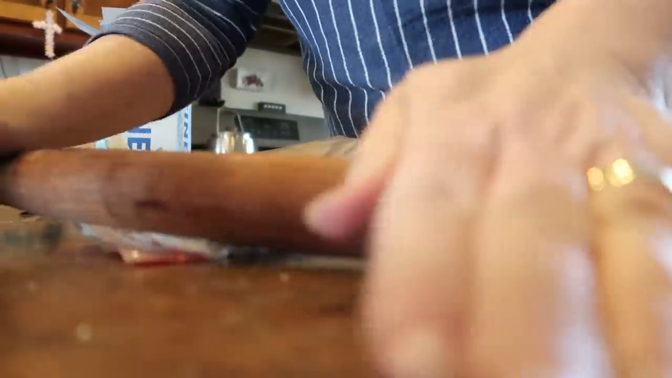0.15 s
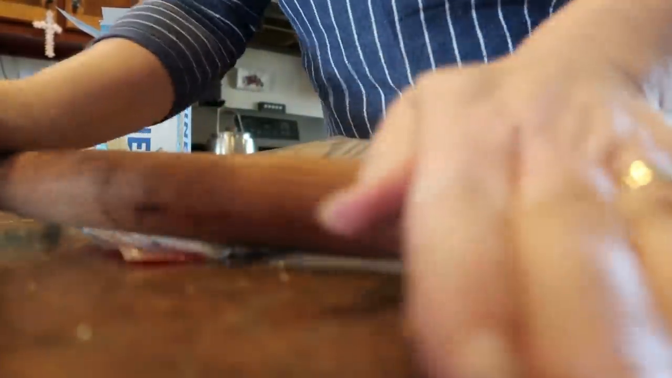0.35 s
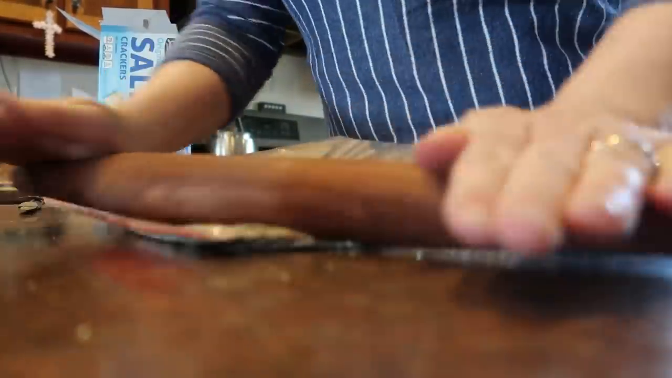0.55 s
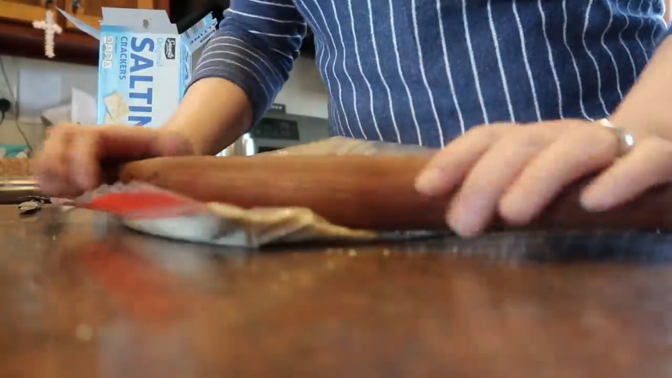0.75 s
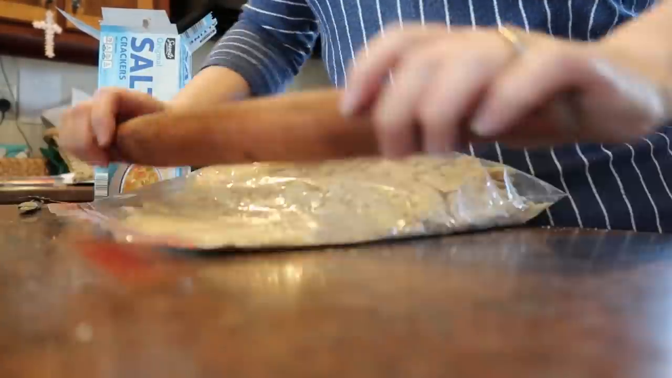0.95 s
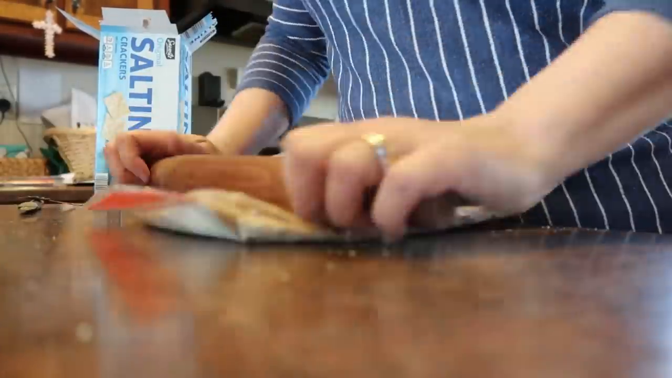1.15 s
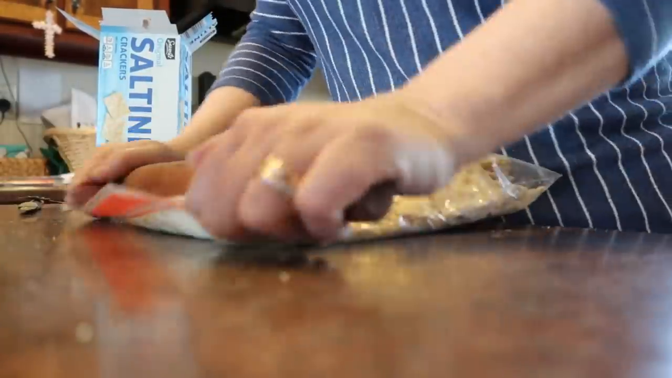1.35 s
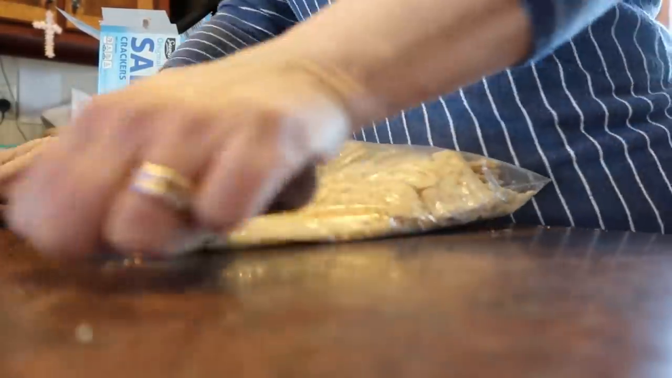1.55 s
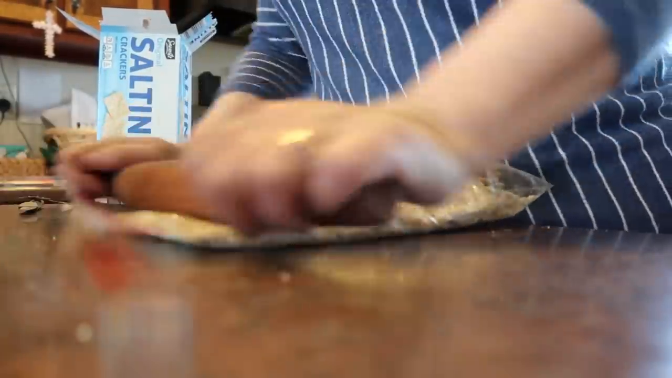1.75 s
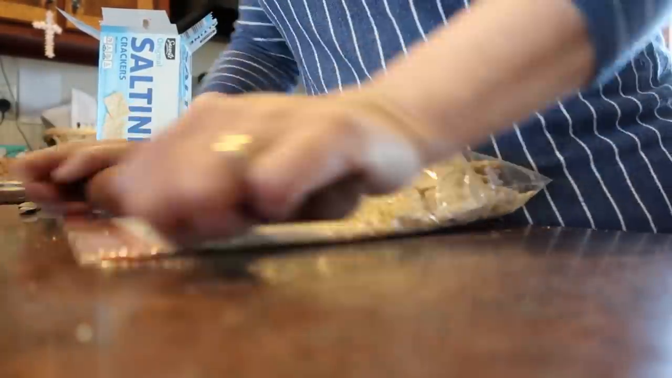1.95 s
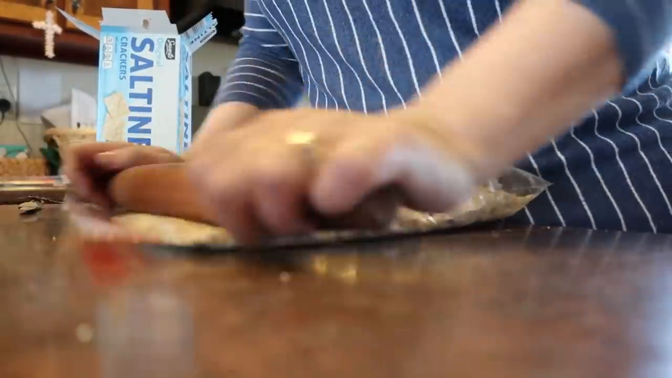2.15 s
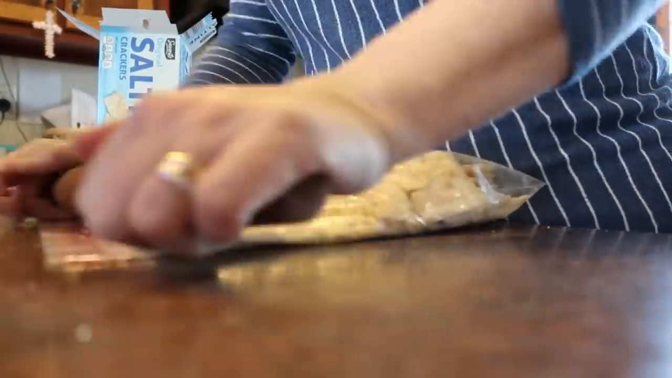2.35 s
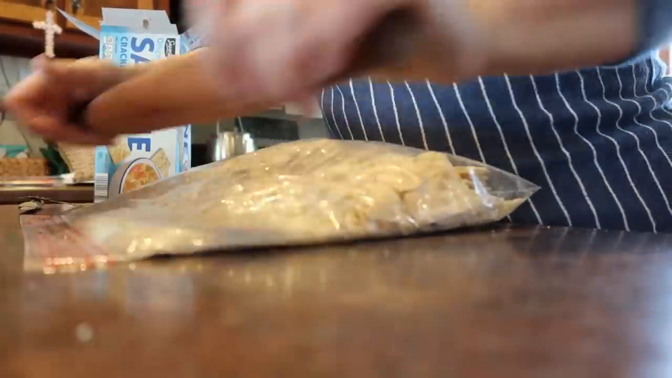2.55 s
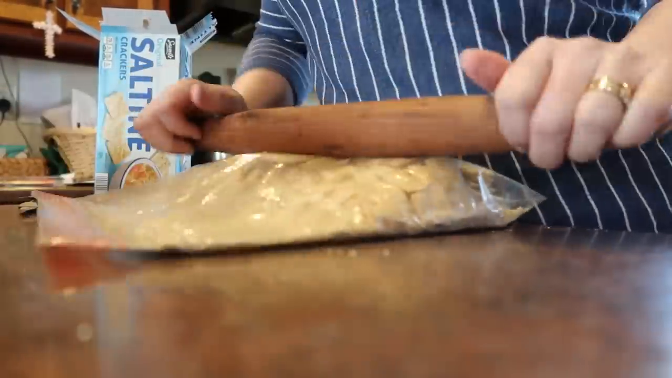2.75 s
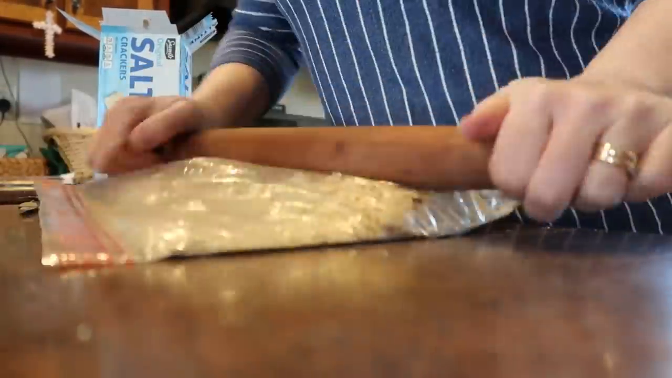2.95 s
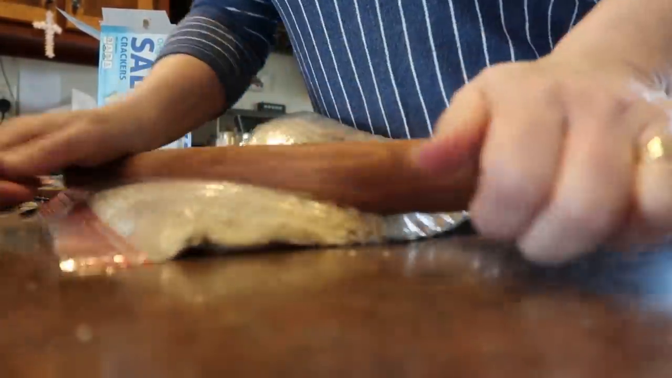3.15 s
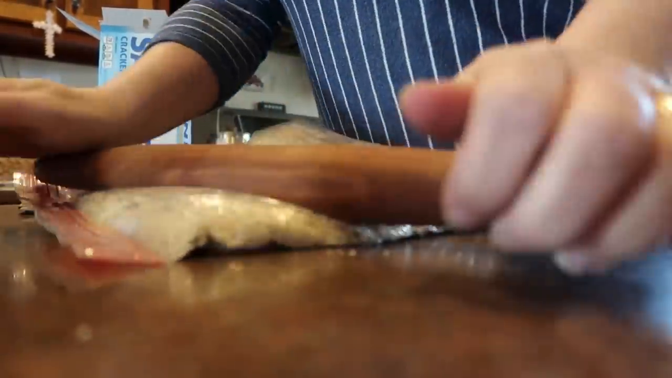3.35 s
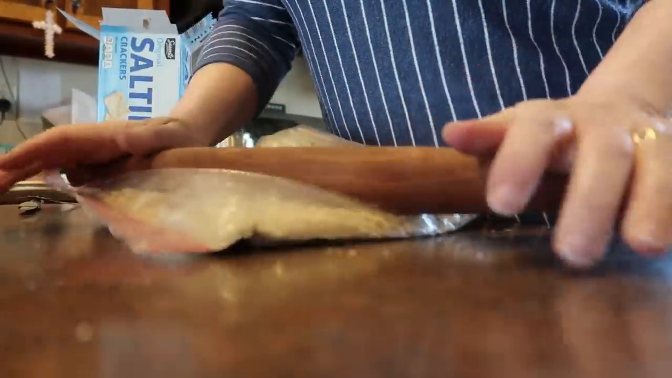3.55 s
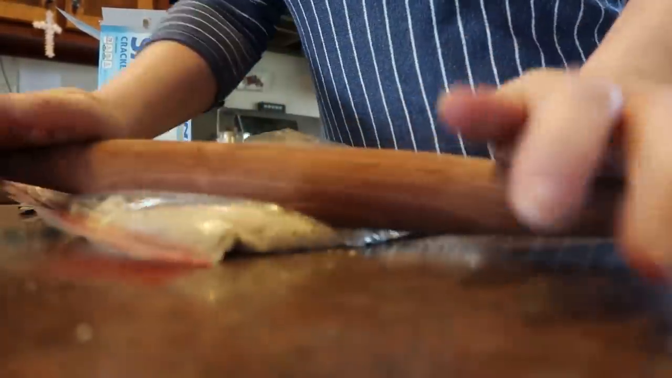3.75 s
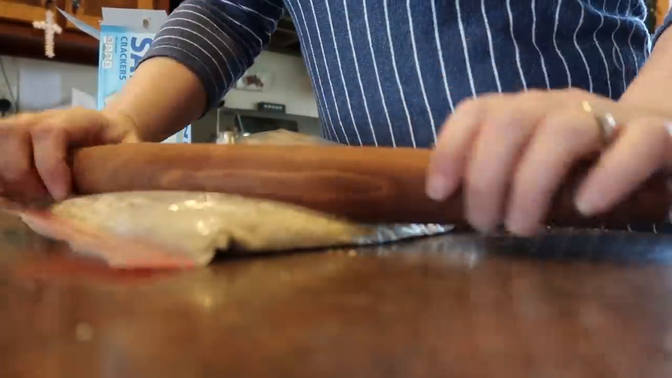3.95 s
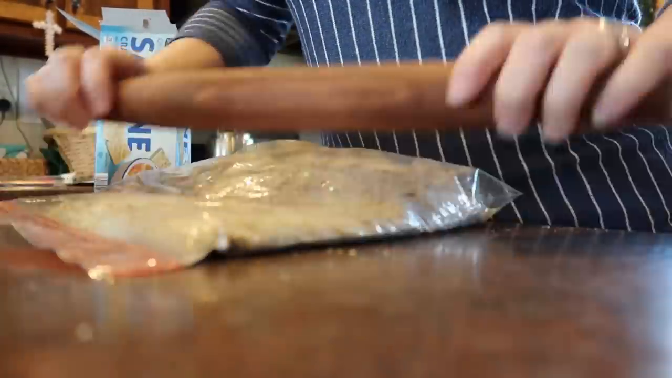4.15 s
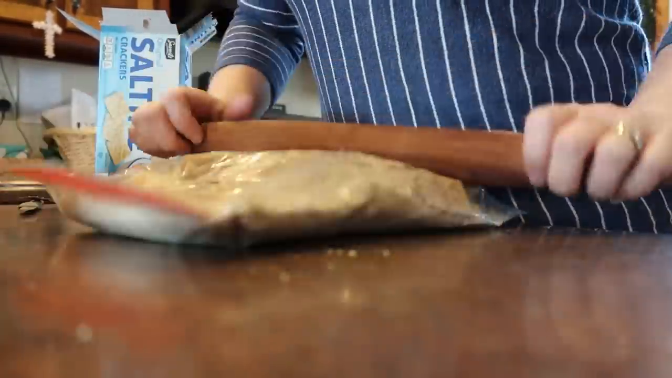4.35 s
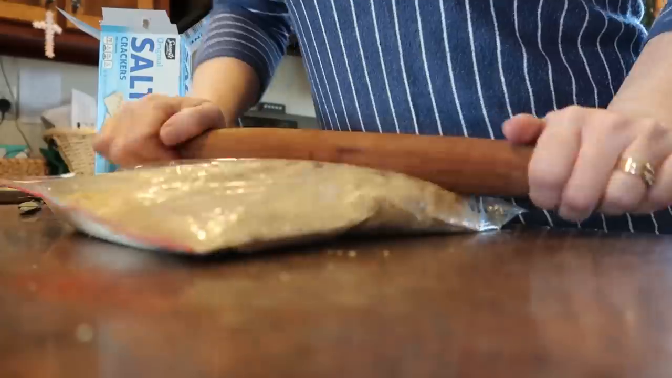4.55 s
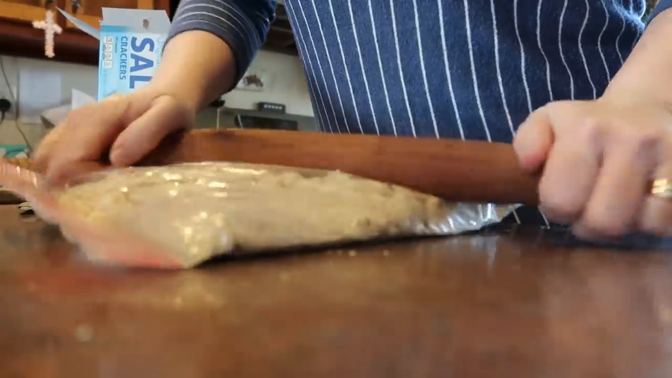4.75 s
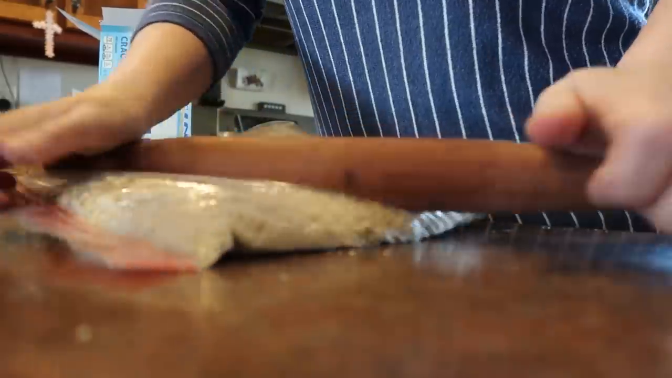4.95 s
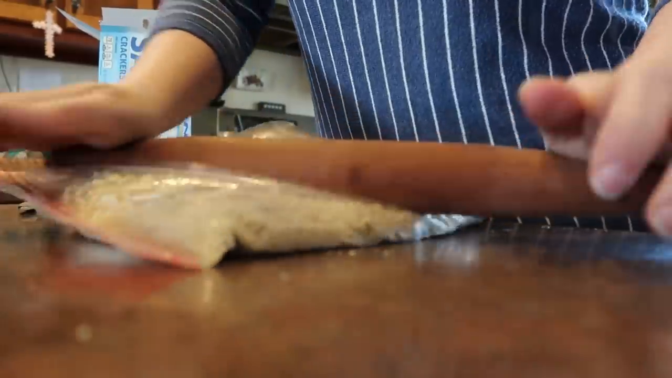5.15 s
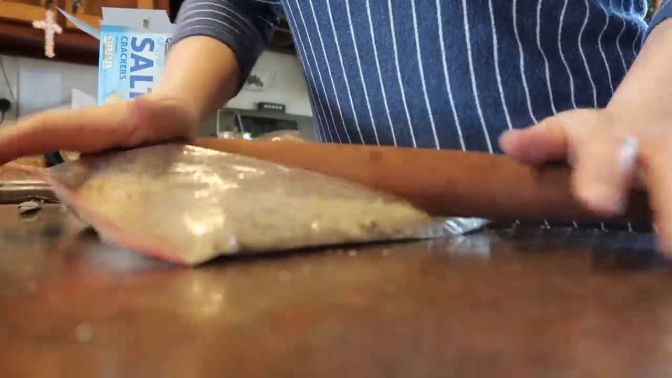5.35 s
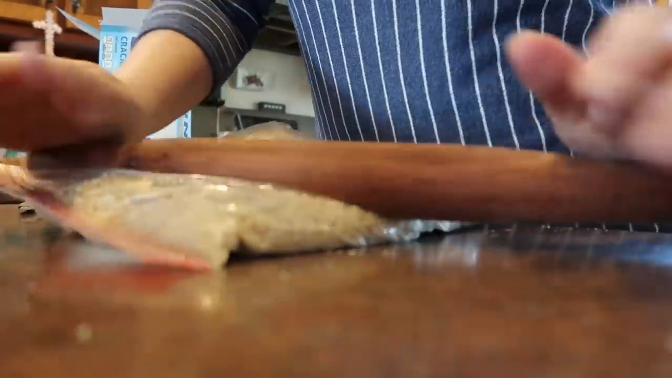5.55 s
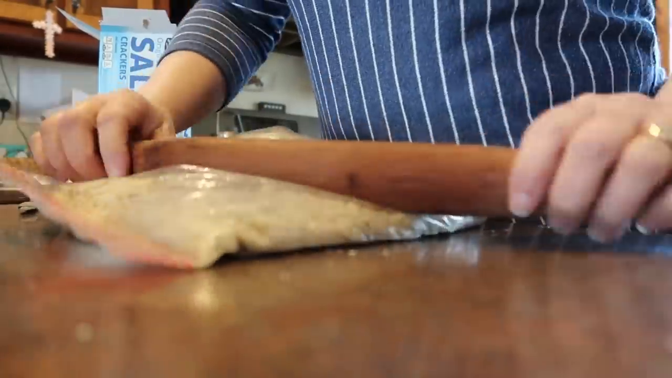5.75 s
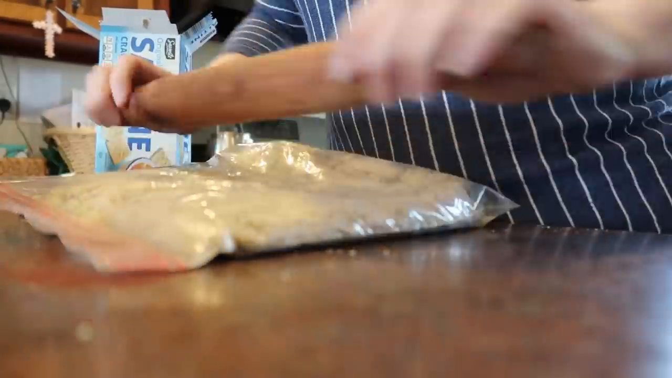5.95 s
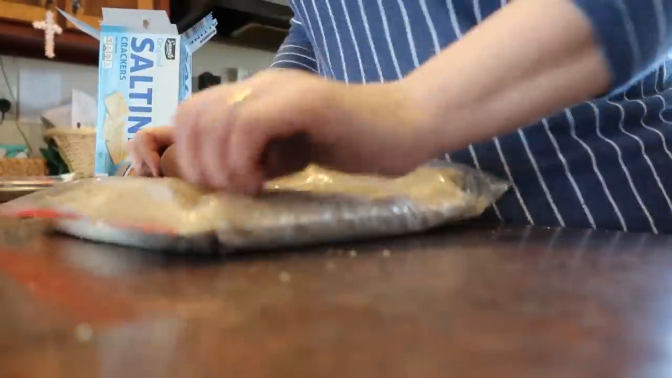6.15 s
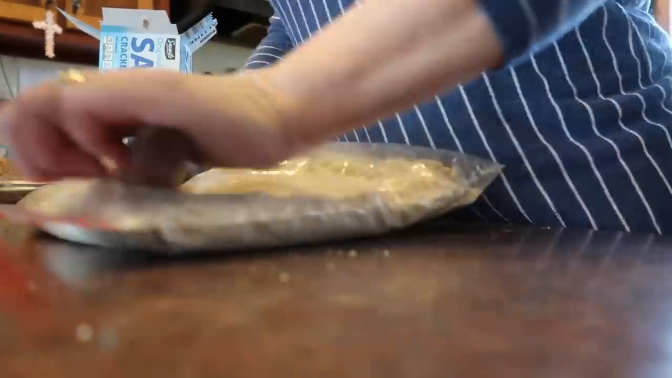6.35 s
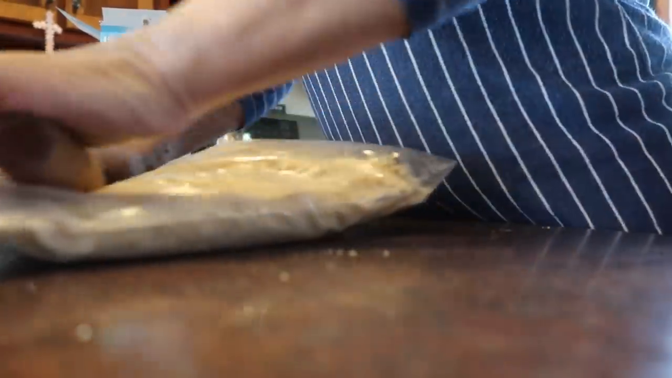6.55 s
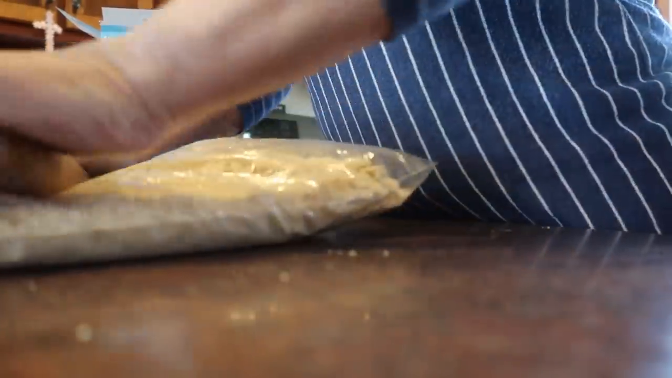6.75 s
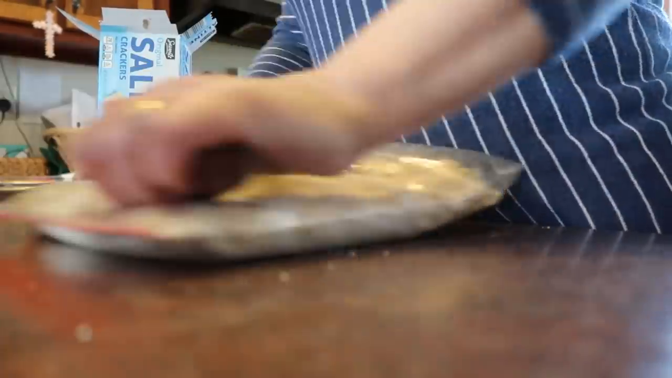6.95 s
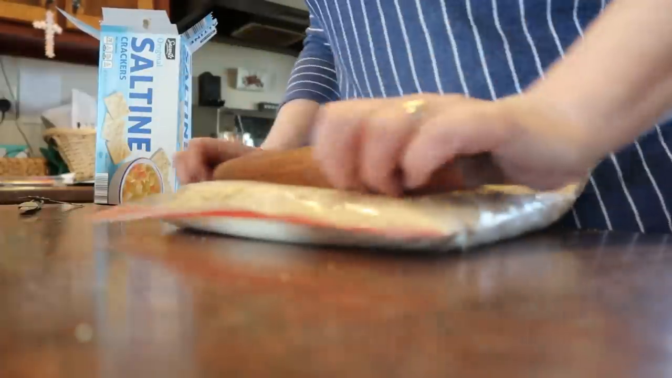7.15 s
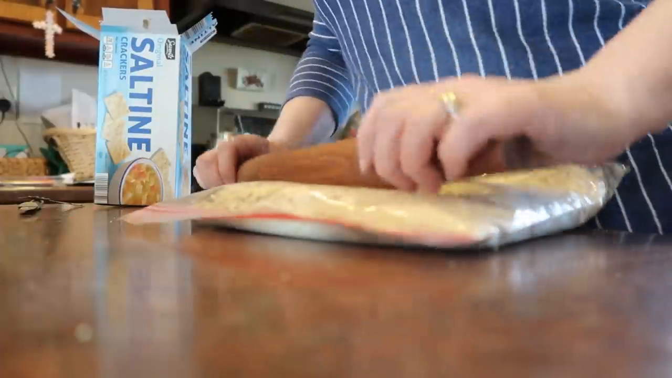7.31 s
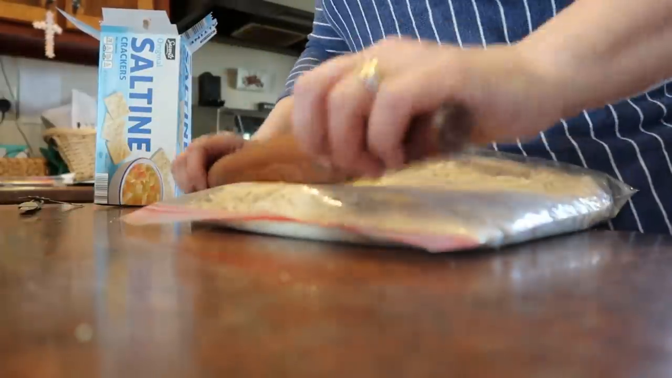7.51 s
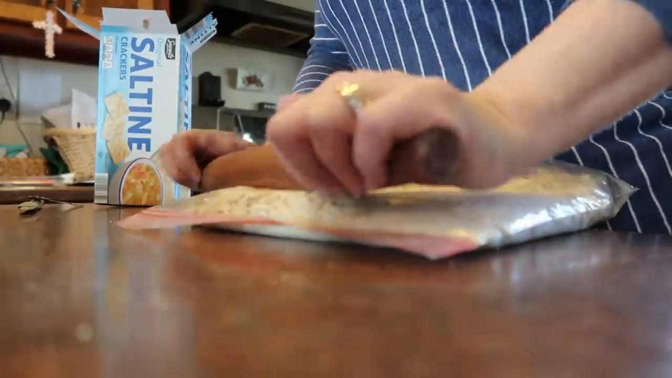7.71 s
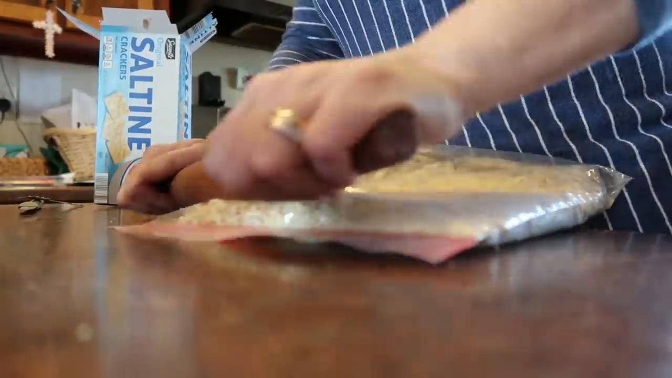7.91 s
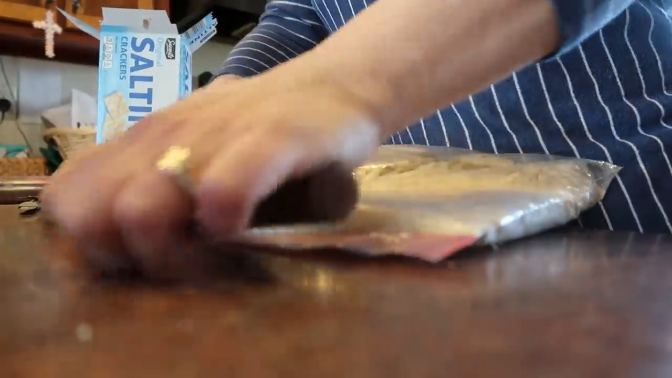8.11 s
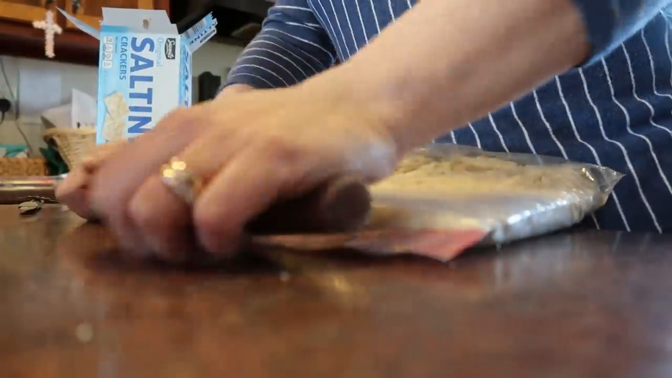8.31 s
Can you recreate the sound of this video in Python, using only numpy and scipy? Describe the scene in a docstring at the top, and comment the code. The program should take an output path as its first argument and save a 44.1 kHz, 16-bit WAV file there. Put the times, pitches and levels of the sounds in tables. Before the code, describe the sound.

A wooden rolling pin crushes dry crackers in a plastic bag on a wooden table, with brittle crunching, crinkling film and dull thuds.

```python
"""Crushing crackers with a rolling pin

A wooden rolling pin crushes crackers in a plastic bag on a kitchen table, in strokes, landings and rustles.
Avalanches of random clicks, filtered, make the crunch, the drumming of the table top and the crinkle of film.
Single pieces crack and snap, splinters and flakes flick, and stiff folds tick: short filtered bursts and rings.
The pin thuds and knocks by ringing the table's modes, and a soft whump of low noise is the air in the bag.
A finger ring clicks on the pin and a taut fold chirps; a short echo and quiet noise make the kitchen."""
import sys
import numpy as np
from scipy import signal
from scipy.fft import rfft, irfft, next_fast_len
from scipy.io import wavfile
from scipy.ndimage import uniform_filter1d

SR = 44100
rng = np.random.default_rng(int(sys.argv[2]) if len(sys.argv) > 2 else 0)


def int16_out(signal):
    """Quantize to a 16-bit WAV file."""
    q = np.round(np.clip(np.atleast_2d(signal).T, -1, 1) * 32767)
    wavfile.write(sys.argv[1], SR, q.astype(np.int16))


N = 373923
TIME = np.arange(N) / SR
SIZE = 2 * next_fast_len(N // 2 + SR // 2)   # padded length for filtering by Fourier transform
FREQS = np.arange(SIZE // 2 + 1) * SR / SIZE


def from_db(db):
    """Decibels to gain."""
    return 10 ** (np.asarray(db) / 20)


def over_hz(points):
    """A table joined by straight lines over log frequency."""
    hz, value = np.transpose(points)
    return np.interp(np.log(FREQS + 1), np.log(hz), value)


def colour(x, spectrum):
    """Causal (minimum-phase) filter, so that clicks keep their sharp fronts."""
    cepstrum = irfft(np.log(from_db(over_hz(spectrum))))
    # fold the second half onto the first: this moves the energy to the earliest moment
    cepstrum[1:SIZE // 2] *= 2
    cepstrum[SIZE // 2 + 1:] = 0
    response = np.exp(rfft(cepstrum))
    return irfft(rfft(x, SIZE) * response)[..., :N]


def band(x, low_hz, high_hz, order=2):
    """Band-pass; the first order has the gentlest slopes and the shortest ring."""
    edges_hz = [low_hz, min(high_hz, .45 * SR)]
    sos = signal.butter(order, edges_hz, "band", fs=SR, output="sos")
    return signal.sosfilt(sos, x + 1e-18)


def steady(x, low_hz, high_hz, span_s):
    """Even out the running rms within a band to about 1; faster detail stays."""
    power = uniform_filter1d(band(x, low_hz, high_hz) ** 2, int(span_s * SR))
    smooth_power = np.abs(uniform_filter1d(power, int(span_s * SR / 2)))
    return x / np.sqrt(smooth_power + 1e-12)


def ring(x, modes):
    """Decaying modes, each ringing as a cosine after a click."""
    out = 0
    for hz, level_db, t60_s in modes:
        r = from_db(-60 / (t60_s * SR))   # decay per sample
        w = 2 * np.pi * hz / SR           # turn per sample
        mode = signal.lfilter([1, -r * np.cos(w)], [1, -2 * r * np.cos(w), r * r], x + 1e-18)
        out = out + from_db(level_db) * mode
    return out


def gliding_ring(x, modes, pitch):
    """Decaying modes whose pitches all move by one ratio."""
    out = 0
    phase = 2 * np.pi * np.cumsum(pitch) / SR
    for hz, level_db, t60_s in modes:
        r = from_db(-60 / (t60_s * SR))
        turn = np.exp(1j * hz * phase)
        mode = signal.lfilter([1], [1, -r], x * np.conj(turn) + 1e-18)
        out = out + from_db(level_db) * np.real(turn * mode)
    return out


def clicks(per_s, spread_db):
    """Random clicks of either sign; a positive spread makes many small and a few large."""
    sizes = from_db(spread_db * np.minimum(rng.exponential(1, N), 5))
    return (rng.random(N) < per_s / SR) * sizes * rng.choice([-1, 1], N)


def taps(rows):
    """One click for each row of time and level."""
    out = np.zeros(N)
    for s, db in rows:
        out[round(s * SR)] += from_db(db)
    return out


def wander(step_s, times=TIME):
    """A random value that glides to a new one at every step."""
    return np.interp(times / step_s, np.arange(N // 8), rng.standard_normal(N // 8))


def avalanches(per_s, fade_s, spread_db, trickle):
    """Each break sets off a burst of activity that dies away over a steady trickle; mean 1."""
    breaks = np.abs(clicks(per_s, spread_db))
    bursts = signal.lfilter([1], [1, -np.exp(-1 / (fade_s * SR))], breaks + 1e-18)
    return (bursts / bursts.mean() + trickle) / (1 + trickle)


def shards(fractures, variety_db, cluster_db, cluster_s=.016):
    """Fragments differ in size, so each click favours other half-octaves; alike ones break in clusters."""
    at, out = np.flatnonzero(fractures), 0
    edges = np.geomspace(90, 17000, 16)
    for low, high in zip(edges, edges[1:]):
        own = np.zeros(N)
        own_db = variety_db * rng.standard_normal(N)[at] + cluster_db * wander(cluster_s, TIME[at])
        own[at] = fractures[at] * from_db(own_db)
        out = out + band(own, low, high, order=1)
    return out


# Background hush of the kitchen. Each row: pitch in Hz, relative level in dB per Hz.
HUSH_SPECTRUM = [(25, -26), (70, 13), (150, 9.5), (300, 8.5), (700, -9), (1000, -30), (2500, -33),
                 (5000, -26), (9000, -26), (15500, -106)]


def hush(level_db):
    """The quiet kitchen: steady noise, the same in both channels because it is added to both alike."""
    air = colour(rng.standard_normal(N), HUSH_SPECTRUM)
    return from_db(level_db) * air / air.std()


ARCH_DB = 0.5   # every movement is this much weaker at its ends than in its middle


def movement(start_s, length_s, growth_db, rise_db_per_s, fall_db_per_s):
    """Level in dB of one movement: it builds, holds in a shallow sloping arch, and dies away."""
    early = np.maximum(start_s - TIME, 0)
    late = np.maximum(TIME - start_s - length_s, 0)
    progress = np.clip((TIME - start_s) / length_s, 0, 1) - .5
    arch = growth_db * progress - ARCH_DB * (2 * progress) ** 2
    return arch - rise_db_per_s * early - fall_db_per_s * late


# The bag left to itself. The three values: relative crunch, table drumming and film crinkle, each in dB.
SETTLING_LEVELS = (-55, -50.5, -60)
# The pin comes down on the bag and crushes what lies under it. Each row: start in seconds,
# length in seconds, then the relative crunch, table drumming and film crinkle in dB.
PIN_LANDINGS = [(1.208, 0.014, -15.5, -21, -29), (2.841, 0.03, -19.5, -20.5, -30),
                (4.435, 0.017, -13.5, -17, -34.5), (6.194, 0.029, -21.5, -23, -39.5),
                (6.226, 0.017, -18, -21.5, -27.5), (7.65, 0.019, -22, -27, -39),
                (7.73, 0.021, -19.5, -20.5, -40)]
LANDING_RISE_DB_PER_S, LANDING_FALL_DB_PER_S = 5000, 368
# One push or pull of the pin over the crackers. Each row: start in seconds, length in seconds,
# relative crunch, table drumming and film crinkle in dB, then the change from start to end in dB.
PIN_STROKES = [(.03, 0.039, -23, -21, -30, -3), (.155, 0.075, -24.5, -21, -27, -4.5),
               (.33, 0.017, -26, -17, -27.5, 2.5), (.445, 0.06, -28.5, -25.5, -32.5, -5),
               (.605, .15, -19, -19, -31, 4.5), (.775, 0.042, -21, -23, -35, 2),
               (1.315, 0.22, -19, -18.5, -30, -1.5), (1.55, .12, -18, -22, -24.5, -2.5),
               (1.78, 0.1, -30.5, -28, -34.5, -10.5), (1.868, 0.065, -23, -22, -34.5, 4.5),
               (2.015, 0.13, -19.5, -21.5, -30, 5), (2.25, 0.06, -21.5, -20.5, -34.5, -0.5),
               (2.39, 0.076, -21.5, -21.5, -32, 2), (2.955, 0.36, -17, -21, -30, 0.5),
               (3.33, 0.091, -22, -29, -32.5, -0.5), (3.515, 0.06, -25.5, -33, -40, -4.5),
               (3.73, 0.12, -18.5, -22, -30, 0.5), (4.485, 0.0089, -20, -20.5, -30.5, 6),
               (4.55, 0.61, -19, -23.5, -32, 0.5), (5.252, 0.13, -23, -28, -34.5, 1),
               (5.478, .13, -20, -24, -32.5, -2), (6.315, 0.22, -20.5, -20, -32.5, -1.5),
               (6.89, 0.062, -23, -26, -36.5, 1), (7.768, 0.061, -25, -28, -39, 0.5),
               (7.825, 0.32, -18.5, -26.5, -33.5, 1.5), (8.19, 0.1, -30, -31.5, -34.5, -2)]
STROKE_RISE_DB_PER_S, STROKE_FALL_DB_PER_S = 336, 293
# The bag shifts with little weight on it. Each row: start in seconds, length in seconds,
# relative crunch, table drumming and film crinkle in dB, then the change from start to end in dB.
BAG_RUSTLES = [(.52, 0.09, -29.5, -25.5, -36.5, 15.5), (.905, 0.12, -31, -34, -45.5, -3),
               (1.198, 0.077, -24.5, -26, -37, 2.5), (2.5, 0.051, -29.5, -32, -40, -1),
               (2.6, 0.092, -48.5, -44, -55, -10), (3.607, 0.064, -33.5, -36, -46, -3),
               (3.93, 0.31, -34, -43, -49.5, 3), (4.429, 0.014, -27, -37, -30, 14),
               (5.67, 0.16, -39.5, -59, -57, -4), (5.8, 0.021, -32.5, -38, -54, -3),
               (5.885, 0.12, -35, -42, -58, -3), (6.6, 0.19, -31, -36.5, -41.5, -6.5),
               (6.99, 0.26, -33, -35, -38.5, 4), (7.16, 0.42, -32.5, -35, -45.5, -10.5),
               (7.685, 0.032, -29, -37, -41, 3), (8.33, 0.21, -45, -43, -56.5, 0)]
RUSTLE_RISE_DB_PER_S, RUSTLE_FALL_DB_PER_S = 1204, 226


def handling():
    """Gains of crunch, drumming and crinkle; the strongest movement of the moment sets each one."""
    landings = [(*row, 0) for row in PIN_LANDINGS]
    levels = np.outer(SETTLING_LEVELS, np.ones(N))
    for rows, rise, fall in ((landings, LANDING_RISE_DB_PER_S, LANDING_FALL_DB_PER_S),
                             (PIN_STROKES, STROKE_RISE_DB_PER_S, STROKE_FALL_DB_PER_S),
                             (BAG_RUSTLES, RUSTLE_RISE_DB_PER_S, RUSTLE_FALL_DB_PER_S)):
        for start_s, length_s, *layers_db, growth_db in rows:
            shape_db = movement(start_s, length_s, growth_db, rise, fall)
            levels = np.maximum(levels, np.add.outer(layers_db, shape_db))
    return from_db(levels)


# Where and how the pin bears on the table. Each row: time in seconds, shift to the left from 0 to 1,
# weight of the bass in dB, hollow sound under the hand in dB, brightness of the crunch in dB.
PIN_STANCE = [(.5, 0.42, -3, 13, 0), (1.05, 0, -1, 1.5, -5), (1.25, 0.8, -9, 2.5, -6),
              (2.5, 0.9, -2.5, 1.5, -7), (2.8, 0, 1, -27, -2.5), (5.9, 0, 1.5, -23, -4),
              (6.2, 0.6, -2, -17, -8), (6.9, 1, 6, -15, -15), (7.2, 0, -1.5, -35, -4.5),
              (7.8, 0.5, -2, 2.5, -3)]


def stance():
    """Leftward shift, bass weight, hollowness and brightness, gliding from row to row."""
    s, *columns = np.transpose(PIN_STANCE)
    return [np.interp(TIME, s, column) for column in columns]


# Tone of breaking cracker. Each row: pitch in Hz, relative level in dB per Hz.
CRUMB_SPECTRUM = [(100, -18.5), (400, -3.5), (800, -2), (1150, -1.5), (2300, -1), (3200, -1.5),
                  (4050, -4.5), (5000, -16.5), (7000, -26), (14000, -46)]


def crunch(gain, activity, left, hollow_db, bright_db, level_db):
    """Fractures come faster the harder the pin bears down; among the crumbs a few large pieces give way."""
    crumbs = clicks(activity * (2600 + 55000 * gain), spread_db=2.0)
    pieces = clicks(60 + 450 * gain, spread_db=0.5) * np.sqrt(1 + 36 * gain)
    coarse = from_db(2 - 6 * left)   # the middle of the bag holds the largest pieces
    fractures = shards(crumbs, variety_db=5.5, cluster_db=2.5)
    fractures = fractures + coarse * shards(pieces, variety_db=-0.5, cluster_db=10.0)
    # the cupped hand swallows the low middle
    swallowed = np.clip(0.32 * from_db(hollow_db), 0, .7)
    shaded = fractures - swallowed * band(fractures, 440, 1030)
    # and screens the treble when it comes in front
    shaded = shaded + (from_db(bright_db) - 1) * band(shaded, 2150, 6000)
    even = steady(colour(shaded, CRUMB_SPECTRUM), 900, 4500, span_s=.036)
    return from_db(level_db) * gain * even


# Modes of the table top, also rung by the lumps and blows.
# Each row: pitch in Hz, relative level in dB, time to fade by 60 dB in seconds.
TABLE_MODES = [(42.5, -16, 0.064), (75.3, -9, 0.11), (96.3, -6.5, 0.098), (145, -3, 0.087),
               (190, 1.5, 0.15), (237.7, 4.5, 0.054), (318.5, 2, 0.044), (431, 7, 0.029), (517, 6, 0.05),
               (584, 5.5, 0.027)]
# Modes of the air gap between hand, pin and table, before their pitch glides.
# Each row: pitch in Hz, relative level in dB, time to fade by 60 dB in seconds.
GAP_MODES = [(290, 0.5, 0.068), (449, -5.5, 0.091), (529, -15.5, 0.096), (770, -2.5, 0.05),
             (1135, -9.5, 0.023), (1482, -7, 0.044)]
HOLLOW_DROP = 0.243   # share by which the pitch of the gap falls as the hand comes round in front


def drumming(gain, activity, left, weight_db, hollow_db, level_db):
    """Crumbs jolt the table top and sound the gap under the hand, whose pitch shifts as the hand rolls."""
    jolts = clicks(900 * activity, spread_db=3.0)
    gap_pitch = 1 - HOLLOW_DROP * left ** 4 + 0.018 * wander(.1)
    gap = band(gliding_ring(jolts, GAP_MODES, gap_pitch), 327, 2540)
    body = band(ring(jolts, TABLE_MODES), 34, 630) + from_db(hollow_db) * gap
    bass = signal.sosfiltfilt(signal.butter(2, 135, fs=SR, output="sos"), body)
    weighted = body + (from_db(weight_db) - 1) * bass
    return from_db(level_db) * gain * steady(weighted, 125, 1060, span_s=0.037)


# Tone of the crinkling film. Each row: pitch in Hz, relative level in dB per Hz.
FILM_SPECTRUM = [(1500, -8), (3300, 13), (4300, 12), (5500, 5.5), (8000, 2.5), (10000, -9.5), (12500, 5),
                 (15500, -17)]


def crinkle(gain, activity, level_db):
    """Creases of the film flip with very short, bright ticks."""
    ticks = shards(clicks(6000 * activity, spread_db=-1.0), variety_db=1.5, cluster_db=6.5)
    even = steady(colour(ticks, FILM_SPECTRUM), 5000, 8500, span_s=.025)
    return from_db(level_db) * gain * even


def splinters(gain, per_s, level_db):
    """Small splinters break off at random, each a lone spike, more often under pressure."""
    breaks = clicks(per_s * gain / gain.mean(), spread_db=-1.5)
    spikes = colour(band(breaks, 780, 7600), CRUMB_SPECTRUM)
    return from_db(level_db) * gain * spikes


# loose flakes: middle pitch, its spread, cycles in which the ring falls to about a third
FLAKE_HZ, FLAKE_OCTAVES, FLAKE_CYCLES = 2105, 0.49, 3.87


def flakes(gain, per_s, follows, level_db):
    """Loose flakes flick, each ringing at its own pitch; they stand out when the pin bears lightly."""
    out, t = np.zeros(N + SR // 50), TIME[:SR // 50]
    flicks = clicks(per_s, spread_db=0.9) * gain ** follows
    pitches = FLAKE_HZ * 2 ** (FLAKE_OCTAVES * np.clip(rng.standard_normal(N), -2, 2))
    for at in np.flatnonzero(flicks):
        cycles = pitches[at] * t
        envelope = np.exp(-cycles / FLAKE_CYCLES) * (1 - np.exp(-2 * cycles))
        out[at:at + len(t)] += flicks[at] * np.sin(2 * np.pi * cycles) * envelope
    return from_db(level_db) * colour(out[:N], CRUMB_SPECTRUM)


def cushion(gain, level_db, fade_s, rolling_share):
    """Each landing squeezes the air in the bag with a deep, soft whump; rolling stirs it only a little."""
    squeeze = np.zeros(N)
    for s, _, _, drum_db, _ in PIN_LANDINGS:
        onset = np.clip((TIME - s) / 0.003, 0, 1)
        squeeze += from_db(drum_db) * np.exp(-np.maximum(TIME - s, 0) / fade_s) * onset
    air = band(rng.standard_normal(N), 37, 87)
    return from_db(level_db) * (squeeze + rolling_share * gain) * air / air.std()


# The pin drops off a thick piece. Each row: start in seconds, relative level in dB, pitch in Hz.
LUMP_KNOCKS = [(0.069, -13, 481), (0.153, -17, 526), (0.201, -17, 250), (0.333, -10.5, 273),
               (0.612, -14, 510), (0.620, -9, 315), (0.705, -10, 189), (0.722, -10.5, 552),
               (1.281, -11, 500), (1.474, -9, 546), (1.596, -10.5, 586), (1.781, -16, 397),
               (2.291, -9, 186), (2.995, -10.5, 567), (3.234, -7.5, 514), (4.731, -16.5, 585),
               (6.251, -7.5, 500), (6.396, -11.5, 623), (6.518, -8.5, 197), (7.663, -17.5, 500)]


def lumps(level_db, t60_s, table_db):
    """The pin drops off a thick piece: a short hollow knock that also shakes the table top."""
    out, t = np.zeros(N), TIME[:SR // 5]
    for s, db, hz in LUMP_KNOCKS:
        at = round(s * SR)
        fade = np.exp(-np.log(1000) * t / t60_s)
        out[at:at + len(t)] += from_db(db) * np.sin(2 * np.pi * hz * t) * fade
    shake = band(ring(taps([row[:2] for row in LUMP_KNOCKS]), TABLE_MODES), 88, 1100)
    return from_db(level_db) * out + from_db(table_db) * shake


# Single clean cracks that stand out of the crunch.
# Each row: start in seconds, relative peak level in dB, pitch in Hz.
CLEAN_CRACKS = [(0.07, -9, 1450), (0.165, -0.5, 3000), (0.341, -5, 1650), (0.734, -0.5, 2900),
                (1.215, -2, 1700), (1.659, -5, 2400), (2.327, -9, 2450), (2.935, -2.5, 2660),
                (3.056, -3, 1650), (3.169, -2, 2100), (3.303, 1, 2000), (3.534, -4.5, 2080),
                (3.847, -12, 2350), (4.134, -15, 1900), (4.592, -5, 1900), (4.746, -2, 1890),
                (4.817, -1, 2000), (4.907, -7, 2600), (4.967, 0, 2280), (5.152, -2, 2160),
                (6.518, -9, 1700), (7.847, -7, 1640), (7.935, 2, 1940), (7.971, -6, 1800),
                (8.003, -0.5, 2200), (8.033, -6, 2250), (8.223, -5, 2970), (8.247, -8.5, 2270)]


def cracks(level_db):
    """A brittle edge breaks cleanly: one brief filtered spike around its pitch."""
    out, click = np.zeros(N), signal.unit_impulse(SR // 100)
    for s, db, hz in CLEAN_CRACKS:
        spike = band(click, hz * 0.67, hz * 1.37)
        at = round(s * SR)
        out[at:at + len(click)] += from_db(db + level_db) * spike / np.abs(spike).max()
    return colour(out, CRUMB_SPECTRUM)


# Whole crackers that snap. Each row: start in seconds, relative level in dB,
# time in which the burst falls to about a third in seconds, pitch in Hz.
CRACKER_SNAPS = [(0.332, -20, 0.0044, 1890), (0.951, -24, .003, 1700), (1.68, -18, 0.0036, 2820),
                 (1.784, -18, 0.0025, 1670), (2.918, -19, 0.0019, 2480), (3.606, -24, 0.0039, 1500),
                 (3.678, -25, .002, 2200), (4.799, -18, 0.003, 1760), (4.901, -10.5, 0.0036, 2480),
                 (5.254, -15.5, 0.0047, 3200), (5.476, -15, 0.0023, 1680), (5.493, -1.5, 0.00069, 2470),
                 (5.9495, -26, 0.005, 1810), (6.251, -12, 0.0024, 910), (6.296, -21, 0.003, 1600),
                 (7.155, -21.5, 0.0028, 2000), (7.722, -24, 0.0026, 1900), (8.204, -17, 0.019, 4200),
                 (8.226, -18, 0.0043, 3050)]


def snaps(level_db, edge_db):
    """A crack runs through a whole piece: a brief noise burst around its pitch, in the colour of crumbs."""
    out, t = np.zeros(N), TIME[:SR // 10]
    for s, db, length_s, hz in CRACKER_SNAPS:
        crack = rng.choice([-1, 1], len(t)) * np.exp(-t / length_s)
        body = band(crack, hz * 0.57, hz * 1.45)
        scale = np.sqrt(length_s * SR / 2 / np.sum(body ** 2))   # gives the body a set energy
        at = round(s * SR)
        out[at:at + len(t)] += from_db(db + level_db) * scale * (body + from_db(edge_db) * crack)
    return colour(out, CRUMB_SPECTRUM)


# Stiff folds of the bag that flip. Each row: start in seconds, relative level in dB.
FOLD_FLIPS = [(1.026, -14), (1.031, -6), (1.039, -18), (1.049, -9.5), (1.784, -3), (3.998, -16),
              (5.223, -7), (5.798, -22), (7.531, -10), (7.570, -32), (7.819, -9)]
# Tone of a flipping fold. Each row: pitch in Hz, relative level in dB per Hz.
FOLD_SPECTRUM = [(300, -18), (1500, 0), (3300, -1.5), (5000, -14), (7000, -22), (9500, -17), (15000, -34)]


def creases(level_db):
    """A stiff fold of the bag flips over with one crisp, bright tick."""
    return from_db(level_db) * colour(taps(FOLD_FLIPS), FOLD_SPECTRUM)


# The pin lands, softly on the bag or hard on the table.
# Each row: start in seconds, relative level in dB, contact time in seconds.
PIN_BLOWS = [(1.21, -31, 0.0031), (1.731, -4, 0.0014), (4.448, -29, 0.0013), (6.23, -26, 0.0025),
             (7.672, -1, 0.019), (8.297, -2, 0.0017)]


def blows(level_db):
    """A half-sine push on the table top; the longer the contact, the duller the thud."""
    force = np.zeros(N)
    for s, db, contact_s in PIN_BLOWS:
        push = np.sin(np.pi * np.clip((TIME - s) / contact_s, 0, 1))
        force += from_db(db + level_db) * push / np.sqrt(np.sum(push) * SR / 1000)
    return band(ring(force, TABLE_MODES), 34, 900)


# The finger ring taps the pin and bounces. Each row: start in seconds, relative level in dB.
FINGER_RING_TAPS = [(5.8703, -24.5), (5.8728, -28)]
# Modes of finger ring against pin.
# Each row: pitch in Hz, relative level in dB, time to fade by 60 dB in seconds.
PIN_MODES = [(750, -3, .006), (1130, -2, 0.06), (1210, -15, .25), (1350, 8, 0.015), (2100, 6, 0.02),
             (2300, 2, 0.057), (2430, -1, 0.028), (3100, -6, .008), (3680, -2, 0.02)]


def ring_click():
    """The finger ring taps the wood, bounces once and sets the pin ringing."""
    sos = signal.butter(6, [600, 3850], "band", fs=SR, output="sos")
    return signal.sosfilt(sos, ring(taps(FINGER_RING_TAPS), PIN_MODES))


# A taut fold of the bag slips under the pin with a double chirp.
# Each row: start in seconds, level in dB, length in seconds, pitch in Hz.
FILM_SLIPS = [(8.1374, 0, 0.0023, 2540), (8.139, 1.5, 0.0015, 3500)]


def slips():
    """The stretched film sticks and slips: a few cycles that swell quickly and stop."""
    out = np.zeros(N)
    for s, db, length_s, hz in FILM_SLIPS:
        progress = np.clip((TIME - s) / length_s, 0, 1)
        swell = np.sin(np.pi * np.sqrt(progress))
        out += from_db(db) * swell * np.sin(2 * np.pi * hz * (TIME - s))
    return out


KITCHEN_T60_S, KITCHEN_DB = 0.3, -13   # fade of the echo by 60 dB, and its level


def kitchen(x):
    """A short diffuse tail: the sound smeared by fading noise."""
    t = TIME[:SR // 2]
    echo = rng.standard_normal(len(t)) * (t > .002) * from_db(-60 * t / KITCHEN_T60_S)
    return from_db(KITCHEN_DB) * signal.fftconvolve(x, echo / np.linalg.norm(echo))[:N]


# Share of the sound that differs between the two microphone ports, as each fracture has its own place
# along the pin. Each row: pitch in Hz, relative level in dB.
SCATTER_SPECTRUM = [(40, -54), (110, -25.5), (300, -16.5), (2500, -20.5), (4200, -5.5), (7000, -10),
                    (9500, -62)]
# The two microphone ports. Each row: pitch in Hz, lead of the left port in radians with the pin centred,
# the same lead with the pin at the left.
PORT_LEADS = [(300, 0, 0), (2000, 0, .3), (3500, .05, .95), (4400, .45, 1.2), (6400, 1.2, 1.6),
              (8000, 1.8, 2.1), (9400, 2.9, 3.05), (10700, 3.0, 3.1), (12000, 2.2, 3.05), (15000, 2.0, 3.0)]


def placed(x, left, pan_db, hop_s):
    """Fractures hop along the pin; treble reaches the right port late, more so with the pin at the left."""
    sides = np.array([[1], [-1]])
    both = rfft(x + sides * colour(x * wander(hop_s), SCATTER_SPECTRUM), SIZE)
    views = []
    for column in (1, 2):
        lead = over_hz(np.array(PORT_LEADS)[:, [0, column]])
        views.append(irfft(both * np.exp(.5j * sides * lead))[:, :N])
    centred, shifted = views
    left = np.clip(left, 0, 1)
    return (1 - left) * centred + left * shifted * from_db(sides * pan_db / 2)


def scene():
    """Crunch, film and table share the same avalanches, in a quiet kitchen."""
    crunch_gain, drum_gain, film_gain = handling()
    left, weight_db, hollow_db, bright_db = stance()
    activity = avalanches(per_s=200, fade_s=.003, spread_db=1.5, trickle=1.8)
    near = crunch(crunch_gain, activity, left, hollow_db, bright_db, level_db=-2.5)
    near = near + drumming(drum_gain, activity, left, weight_db, hollow_db, level_db=-3.0)
    near = near + crinkle(film_gain, activity, level_db=-6.0)
    near = near + splinters(crunch_gain, per_s=45, level_db=22)
    near = near + flakes(crunch_gain, per_s=200, follows=0.87, level_db=-1.5)
    near = near + cushion(drum_gain, level_db=-16, fade_s=0.22, rolling_share=0.13)
    near = near + lumps(level_db=-5.0, t60_s=0.069, table_db=-23.5)
    near = near + cracks(level_db=-0.5) + snaps(level_db=3.5, edge_db=-16.0)
    near = near + creases(level_db=17.0) + blows(level_db=-16.0)
    near = near + ring_click() + slips()
    # pan_db: how much louder the left is with the pin fully at the left
    return placed(near + kitchen(near), left, pan_db=1.1, hop_s=0.00085) + hush(level_db=-48)


OVERLOAD, CUTOFF_HZ = 0.94, 15700   # highest level before clipping, upper edge of the treble


def record(dry):
    """Peaks overload and the top is cut."""
    clipped = np.clip(dry, -OVERLOAD, OVERLOAD)
    sos = signal.ellip(12, .1, 105, CUTOFF_HZ, fs=SR, output="sos")
    return signal.sosfilt(sos, clipped)


dry = scene()
out = record(dry)
int16_out(out)
```